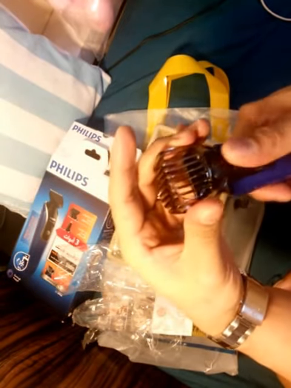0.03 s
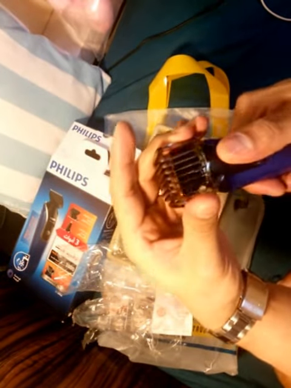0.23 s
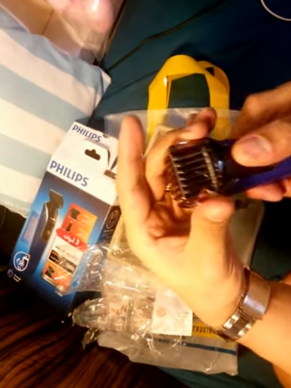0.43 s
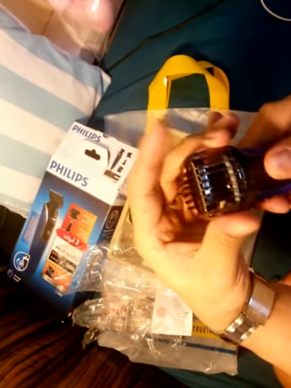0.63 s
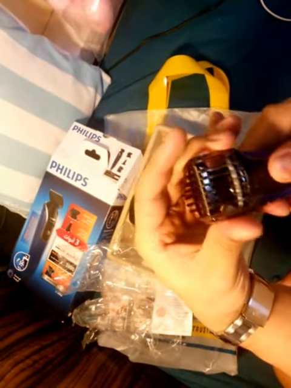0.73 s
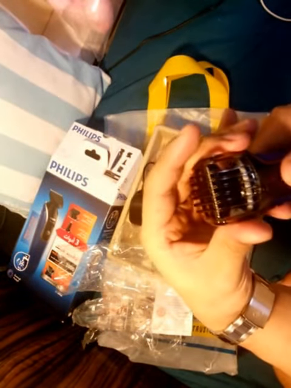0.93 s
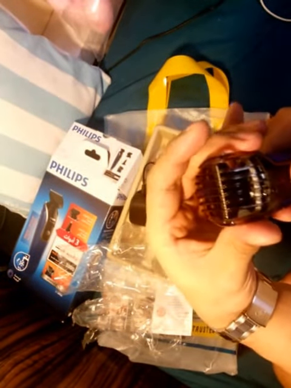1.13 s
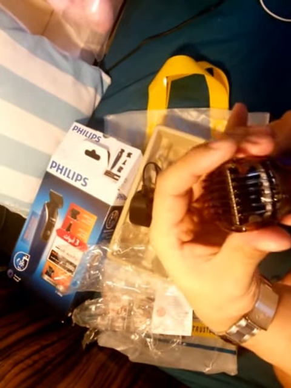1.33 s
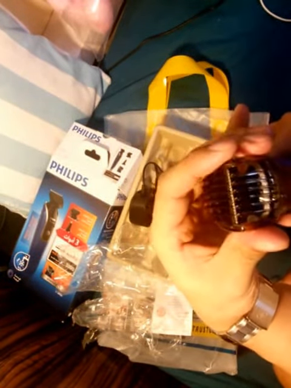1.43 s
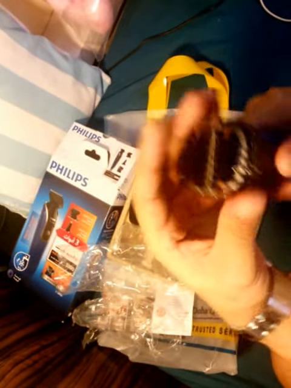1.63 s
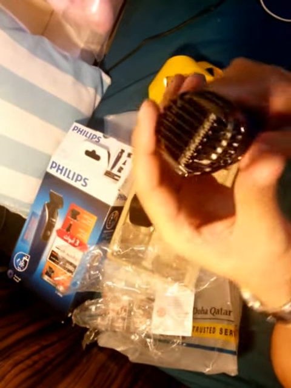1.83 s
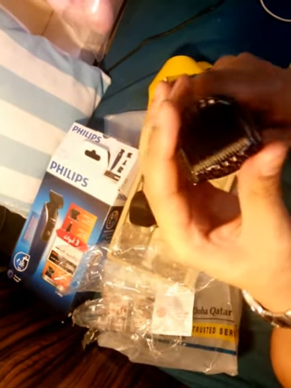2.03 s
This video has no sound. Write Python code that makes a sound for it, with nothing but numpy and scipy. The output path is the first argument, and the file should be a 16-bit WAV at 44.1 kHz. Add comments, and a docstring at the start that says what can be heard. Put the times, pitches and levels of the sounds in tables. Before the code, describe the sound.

Rapid, sharp clicks come from plastic comb teeth bending and snapping back under a finger, right at the microphone. Then fingers shift faintly on the plastic and the handle knocks softly once, in a quiet room with low rumble and hum.

```python
"""A few faint ticks, then a quick run of hard clicks: a finger runs over a plastic trimmer comb.
Its teeth bend and snap back, mostly in pairs, so close to the microphone that the left channel clips.
Then the fingers shift on the plastic with faint ticks and rubs, and the handle knocks once.
Under it all, the low rumble of the hand on the microphone and an appliance hum in a small quiet room."""
import sys
import numpy as np
from scipy import signal
from scipy.fft import rfft, irfft
from scipy.io import wavfile

SR = 44100
rng = np.random.default_rng(int(sys.argv[2]) if len(sys.argv) > 2 else 0)


def wrap_up_sound(samples):
    """Save the sound to the file named by the first command line argument, as 16-bit audio."""
    columns = np.atleast_2d(samples).T
    # keep every value between -1 and 1, then stretch to whole-number steps
    tamed = np.clip(columns, -1, 1)
    steps = np.round(tamed * 32767).astype(np.int16)
    wavfile.write(sys.argv[1], SR, steps)


N = 92610
T = np.arange(N) / SR


def from_db(db):
    """Decibels to gain."""
    return 10 ** (np.asarray(db) / 20)


def unit_rms(x):
    """Scale to rms 1."""
    return x / np.sqrt(np.mean(x ** 2) + 1e-20)


def on_fft_grid(points):
    """Interpolate (f/Hz, value) rows over log frequency."""
    hz, value = np.transpose(points)
    return np.interp(np.log(np.fft.rfftfreq(N, 1 / SR) + 1), np.log(hz), value)


def colour(x, eq):
    """Minimum-phase filter with unit power gain: EQ levels are relative."""
    cepstrum = irfft(np.log(from_db(on_fft_grid(eq))), N)
    causal = cepstrum * (1 + np.sign(np.fft.fftfreq(N)))
    response = irfft(np.exp(rfft(causal)), N)
    return signal.fftconvolve(x, response / np.linalg.norm(response))[:N]


def ports(x, left_eq, right_eq, right_db=0):
    """Colour a stereo sound as each microphone port hears it."""
    return np.array([colour(x[0], left_eq), from_db(right_db) * colour(x[1], right_eq)])


def decay(t, t60_s):
    """Exponential decay."""
    return from_db(-60 * t / t60_s)


def ring(t, hz, t60_s):
    """One decaying mode."""
    return np.sin(2 * np.pi * hz * t) * decay(t, t60_s)


def swells(rows):
    """Envelope of peaks; rise and fade are 1/e times."""
    return sum(from_db(db) * np.exp(-np.maximum((peak_s - T) / rise_s, (T - peak_s) / fade_s))
               for peak_s, db, rise_s, fade_s in rows)


def add(out, at_s, sound):
    """Mix a sound in at a given time."""
    start = max(int(at_s * SR), 0)
    part = sound[..., :N - start]
    out[..., start:start + part.shape[-1]] += part


# Room noise spectrum: f/Hz, level/dB
AIR_EQ = [(20, -4.5), (57, -7), (124, -6.5), (217, -19), (280, -14), (340, -17), (430, -15.5), (640, -23),
          (760, -21), (1460, -28), (2280, -30), (5000, -33.5), (7500, -38.5), (15000, -40.5)]
# Left-right correlation: f/Hz, coefficient (negatives play as 0)
AIR_CORRELATION = [(60, 0.5), (180, 0.86), (550, 0.6), (1650, -0.56), (4970, -0.11), (15000, -0.02)]

def room_air(level_db=-51.5):
    """Steady room noise, partly alike at both ports in the bass."""
    mid, side = rfft(rng.standard_normal((2, N)))
    alike = np.clip(on_fft_grid(AIR_CORRELATION), 0, .99)
    spectrum = np.sqrt(1 + alike) * mid + np.sqrt(1 - alike) * side * [[1], [-1]]
    air = irfft(from_db(on_fft_grid(AIR_EQ)) * spectrum, N)
    return from_db(level_db) * unit_rms(air)


# Hum envelopes: t/s, lower tone level/dB, upper tone level/dB
HUM_LEVELS = [(0, -55.5, -78), (.15, -55, -54.5), (.55, -62.5, -72.5), (.85, -61.5, -65),
              (1.05, -58.5, -60.5), (1.45, -63.5, -52.5), (1.7, -55.5, -52), (1.83, -55.5, -58),
              (2.1, -59.5, -57.5)]

def appliance_hum(tones_hz=(97, 140.1), waver_ratio=.0073):
    """An appliance hums in two tones that waver slightly in pitch."""
    out = np.zeros(N)
    times_s, *levels_db = np.transpose(HUM_LEVELS)
    for hz, db in zip(tones_hz, levels_db):
        waver = np.interp(T, np.linspace(0, T[-1], 20), rng.standard_normal(20))
        phase = 2 * np.pi * np.cumsum(hz * (1 + waver_ratio * waver)) / SR
        out += from_db(np.interp(T, times_s, db)) * np.sqrt(2) * np.sin(phase)
    return out


# Rumble envelope: t/s, level/dB
RUMBLE_LEVELS = [(0, -44), (.25, -45.5), (.5, -42.5), (.65, -43.5), (1.05, -49), (1.2, -50.5),
                 (1.35, -46.5), (1.75, -55), (2.1, -50)]
# Rumble spectrum: f/Hz, level/dB
RUMBLE_EQ = [(12, -25), (24, -8.5), (33, -2.5), (40, -11), (50, -8), (62, -20.5), (120, -36.5),
             (400, -66.5)]

def handling_rumble():
    """The hand that holds the microphone rumbles."""
    spectrum = from_db(on_fft_grid(RUMBLE_EQ)) * rfft(rng.standard_normal(N))
    envelope = from_db(np.interp(T, *np.transpose(RUMBLE_LEVELS)))
    return envelope * unit_rms(irfft(spectrum, N))


# Hollow tone swells: peak t/s, level/dB, rise/s, fade/s
HOLLOW_SWELLS = [(1.04, -56.5, .06, .04), (1.27, -60.5, 0.044, 0.078), (1.43, -64, 0.072, .1)]
# Resonance shape: f/Hz, level/dB
HOLLOW_EQ = [(300, -39), (410, -24.5), (450, 3), (490, -21), (700, -41.5), (2000, -70.5)]

def hollow_tone():
    """A faint narrow resonance comes and goes."""
    return swells(HOLLOW_SWELLS) * colour(rng.standard_normal(N), HOLLOW_EQ)


# Left port spectrum of hiss and finger rubs: f/Hz, level/dB
HISS_RUB_LEFT_EQ = [(100, -15.5), (1400, -21.5), (3000, -22), (5000, -17), (7200, -12.5), (8500, -10),
                    (10000, 3), (11200, -1), (12500, -6), (15000, -15.5)]

def microphone_hiss(level_db=-65):
    """The left port hisses."""
    hiss = from_db(level_db) * colour(rng.standard_normal(N), HISS_RUB_LEFT_EQ)
    return np.array([hiss, np.zeros(N)])


# Reverb spectrum: f/Hz, level/dB
REVERB_EQ = [(200, -3), (1400, -1.5), (2600, -3), (3600, 1), (5200, -2), (7000, 0), (10500, 0.5),
             (15000, -3)]

def room_reverb(x, send_db=-15.5, t60_s=.21, onset_s=.006):
    """A short diffuse tail, different at each port."""
    t = T[:SR // 2]
    build_up = 1 - np.exp(-(t / onset_s) ** 2)
    tail = rng.standard_normal((2, len(t))) * decay(t, t60_s) * build_up
    tail /= np.linalg.norm(tail, axis=1, keepdims=True)
    wet = signal.fftconvolve(x, tail, axes=1)
    return from_db(send_db) * ports(wet, REVERB_EQ, REVERB_EQ, right_db=1.5)


def friction(strokes, slips_per_s=5000, spread_db=-3.5):
    """Dense tiny slips of uneven strength swell and fade with each stroke."""
    slipping = rng.random(N) < slips_per_s / SR
    strength = from_db(spread_db * np.minimum(rng.exponential(1, N), 4))
    return swells(strokes) * unit_rms(slipping * strength * rng.standard_normal((2, N)))


# Palm strokes: peak t/s, level/dB, rise/s, fade/s
PALM_STROKES = [(1.235, -61.5, 0.033, 0.044), (1.412, -66, 0.037, 0.022)]
# Squeak spectrum: f/Hz, level/dB
PALM_EQ = [(300, -17), (1700, -10), (2220, 5), (2600, -19.5), (4300, -6), (8000, -30)]

def palm_drags():
    """The palm drags on the handle with a faint squeak."""
    return ports(friction(PALM_STROKES), PALM_EQ, PALM_EQ)


# Finger strokes: peak t/s, level/dB, rise/s, fade/s
FINGER_STROKES = [(.04, -31, 0.0032, 0.0034), (.062, -40, 0.019, 0.029), (.18, -53, 0.012, 0.014),
                  (.635, -52, .02, 0.044), (.73, -53, 0.013, 0.012), (.85, -56, 0.062, 0.039),
                  (1.04, -53, .03, .015), (1.615, -58.5, .05, 0.072), (1.784, -33.5, 0.0053, .008),
                  (1.977, -49, 0.01, .03), (2.03, -47, .025, 0.034)]
# Right port spectrum of rubs and ticks: f/Hz, level/dB
TOUCH_RIGHT_EQ = [(100, -14.5), (800, -14), (1500, -0.5), (2800, -12), (4200, 5.5), (5200, 0),
                  (7000, -12.5), (10000, -12.5), (15000, -11)]

def finger_rubs():
    """Skin rubs on the plastic comb."""
    return ports(friction(FINGER_STROKES), HISS_RUB_LEFT_EQ, TOUCH_RIGHT_EQ, right_db=-14.5)


# Knock spectrum: f/Hz, level/dB
KNOCK_EQ = [(200, -4), (800, -12), (1400, -2.5), (2100, -2), (2900, -2), (4500, -6), (8000, -21),
            (15000, -28)]

def handle_knock(at_s=2.0603, level_db=-39.5, t60_s=.025):
    """The handle knocks softly in the grip."""
    out = np.zeros((2, N))
    add(out, at_s, from_db(level_db) * rng.standard_normal((2, N)) * decay(T, t60_s))
    return ports(out, KNOCK_EQ, KNOCK_EQ)


# Light touches: t/s, relative level/dB
FINGER_TICKS = [(.011, -39), (0.039, -28.5), (.116, -29), (.614, -36.5), (.622, -36), (0.629, -32),
                (0.713, -37), (0.7226, -29), (0.7328, -31), (.743, -36.5), (0.79, -33), (.8135, -37),
                (.846, -36.5), (.852, -39), (.861, -38), (.881, -39), (0.9157, -40), (.995, -39.5),
                (1.008, -40), (1.021, -42), (1.0362, -33), (1.05, -38), (1.1415, -32.5), (1.146, -29.5),
                (1.158, -37), (1.2725, -40), (1.3099, -29), (1.436, -33.5), (1.5316, -39.5), (1.6075, -46),
                (1.688, -42.5), (1.881, -42.5)]
# Left port spectrum of ticks: f/Hz, level/dB
TICK_LEFT_EQ = [(100, -13.5), (1400, -12.5), (3000, -18), (5000, -11.5), (7200, -13.5), (8500, -6.5),
                (9700, 3), (11000, 1), (12500, -13), (15000, -26.5)]

def finger_ticks(gain_db=1, attack_s=.00059, t60_s=.01):
    """Skin and nail touch the comb and excite the plastic for a moment."""
    out, t = np.zeros((2, N)), T[:SR // 20]
    envelope = (1 - np.exp(-t / attack_s)) * decay(t, t60_s)
    for at_s, db in FINGER_TICKS:
        add(out, at_s, from_db(gain_db + db) * rng.standard_normal((2, len(t))) * envelope)
    return ports(out, TICK_LEFT_EQ, TOUCH_RIGHT_EQ, right_db=-13)


# Snaps, levels relative: t/s, level/dB, tooth f/Hz, tooth level/dB,
# cavity f/Hz, cavity level/dB, thud level/dB, slip level/dB
TOOTH_SNAPS = [(0.2295, 0, 5080, -4.5, 1400, 4.5, -3.5, -35.5), (0.231, -1.5, 6930, 9, 1500, 9, -3.5, -34),
               (0.2332, -1.5, 4510, 0, 1350, 6.5, -7, -31), (.238, 1.5, 5674, -7.5, 1450, -8, -7.5, -27),
               (.2424, -3, 5500, -15, 1450, -0.5, 1, -27), (0.2566, -3, 5700, -5.5, 1600, 5, -6.5, -20.5),
               (0.271, 1.5, 4990, -13, 1280, 5, -4, -21), (0.2959, 3, 4900, -15, 1600, -6.5, -5.5, -22.5),
               (0.3009, 0.5, 5130, 0, 1550, -8.5, -4, -20), (.3303, 4.5, 5016, -5, 1500, -9.5, 1, -21),
               (0.3365, 2, 4700, -17.5, 1750, -6.5, 1, -20),
               (0.3594, 4.5, 5220, -17.5, 1650, -9, 1.5, -19.5),
               (0.3664, -0.5, 5000, -7.5, 1600, -6, 8, -8.5), (.401, -2, 4180, 0, 1450, 0, -2, -16),
               (0.4075, 4.5, 3680, 4.5, 900, -4.5, 17.5, -25), (0.4346, -2.5, 5480, 2, 1000, 8.5, 5, -17),
               (0.4796, -3, 5020, 7.5, 1630, -4.5, 11, -14.5)]
# Plastic shell modes: f/Hz, level/dB, t60/s
SHELL_RINGS = [(1335, -29.5, 0.072), (3540, -15, 0.024)]
# Spectra of the snap at each port and of the handle thud: f/Hz, level/dB
SNAP_LEFT_EQ = [(100, -53.5), (700, -34.5), (1400, -25), (2600, -23.5), (3600, -18.5), (5000, -18),
                (7000, -18.5), (8400, -8.5), (9600, -3), (10600, 1.5), (12500, -7.5), (15000, -21)]
SNAP_RIGHT_EQ = [(100, -36.5), (750, -35.5), (1450, -12), (2400, -13.5), (3600, -12), (5100, -1.5),
                 (6500, -6.5), (8500, -5), (10500, -10.5), (12000, -16), (14500, 3), (16000, -7.5)]
THUD_EQ = [(60, -2), (200, 1.5), (500, -5), (900, -15), (1500, -5), (4000, -34.5)]

def tooth_snaps(gain_db=5, slip_s=.0053, split_ratio=.07):
    """A tooth slips off the finger and cracks back; tooth, cavity and shell ring, the handle thuds."""
    clicks, thuds, t = np.zeros((2, N)), np.zeros((2, N)), T[:SR // 10]
    for at_s, db, tooth_hz, tooth_db, cavity_hz, cavity_db, thud_db, slip_db in TOOTH_SNAPS:
        crack, scatter, slip, thud = rng.standard_normal((4, 2, len(t)))
        slip *= from_db(slip_db) * np.exp(-2 * t[::-1] / slip_s)
        crack *= decay(t, t60_s=.016)  # dense short modes
        scatter *= from_db(-11.5) * decay(t, t60_s=.048)  # reflections off hands and packaging
        planes_hz = tooth_hz * (1 - split_ratio), tooth_hz * (1 + split_ratio)  # two bending planes
        tooth = sum(ring(t, hz, t60_s=.0074) * rng.choice([-1, 1], (2, 1)) for hz in planes_hz)
        tooth *= from_db(tooth_db - 6.5)
        cavity = from_db(cavity_db - 9) * ring(t, cavity_hz, t60_s=.016)  # hollow under the comb
        shell = sum(from_db(mode_db) * ring(t, hz * rng.uniform(.97, 1.03), t60_s)
                    for hz, mode_db, t60_s in SHELL_RINGS)
        gain = from_db(gain_db + db)
        add(clicks, at_s - len(t) / SR, gain * slip)
        add(clicks, at_s, gain * (crack + scatter + tooth + cavity + shell))
        add(thuds, at_s, from_db(thud_db - 29) * thud[0] * decay(t, t60_s=.0095))
    return (ports(clicks, SNAP_LEFT_EQ, SNAP_RIGHT_EQ, right_db=-12)
            + ports(thuds, THUD_EQ, THUD_EQ, right_db=-17.5))


def scene():
    """The comb in the hands, its reverb and the background."""
    comb = tooth_snaps() + finger_ticks() + finger_rubs() + palm_drags() + handle_knock()
    reverb = room_reverb(comb)
    background = room_air() + appliance_hum() + microphone_hiss() + handling_rumble() + hollow_tone()
    return background + reverb + comb


def record(dry):
    """The input overloads, the top is cut, and the output stops at full scale."""
    cutoff_hz = 15700
    low_pass = signal.ellip(10, .1, 70, cutoff_hz, fs=SR, output="sos")
    overloaded = np.clip(dry, -1, 1)
    return np.clip(signal.sosfilt(low_pass, overloaded), -1, 1)


dry = scene()
out = record(dry)
wrap_up_sound(out)
```